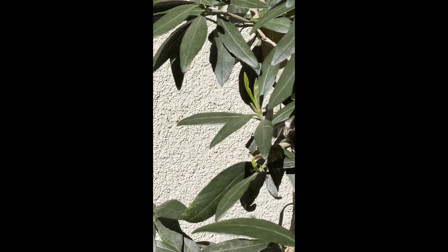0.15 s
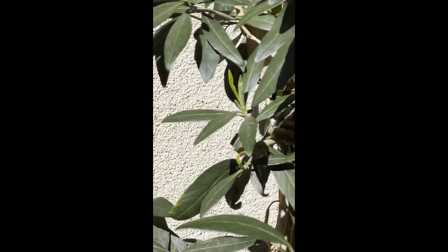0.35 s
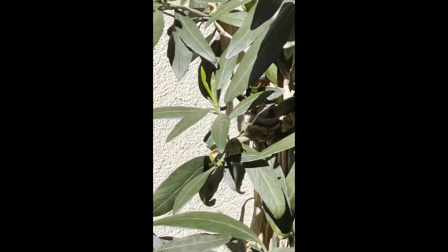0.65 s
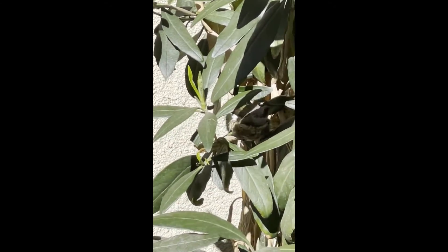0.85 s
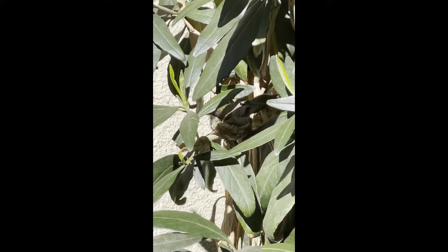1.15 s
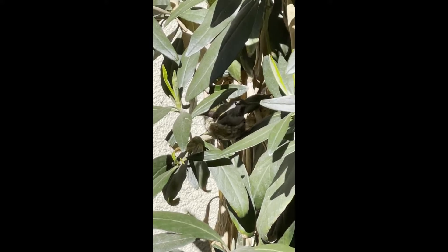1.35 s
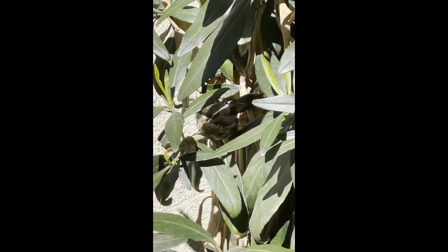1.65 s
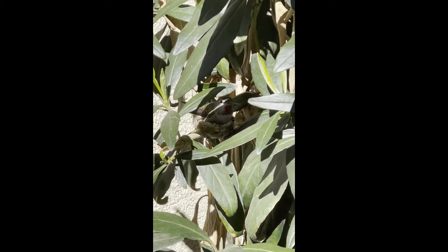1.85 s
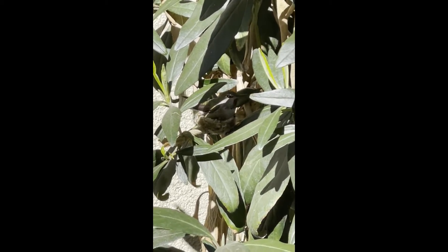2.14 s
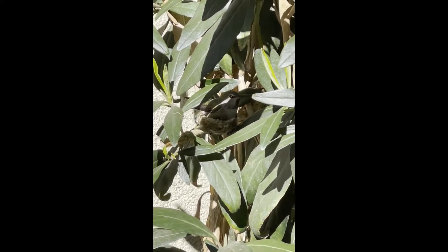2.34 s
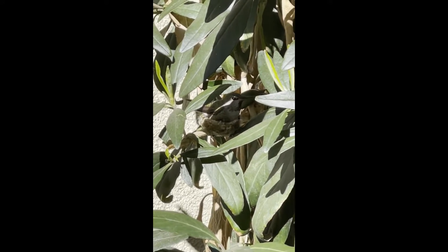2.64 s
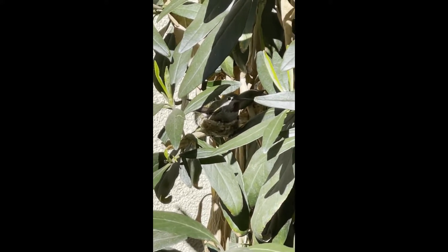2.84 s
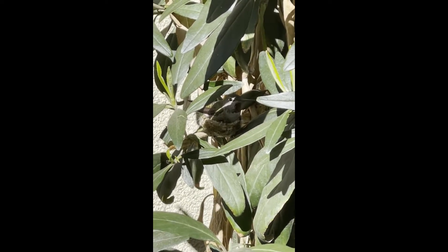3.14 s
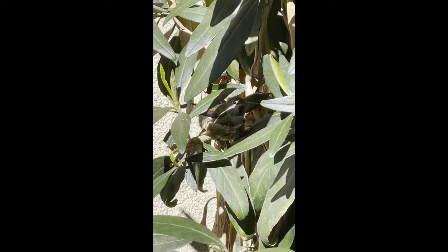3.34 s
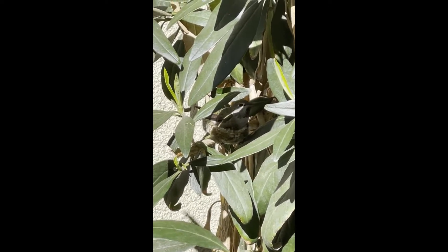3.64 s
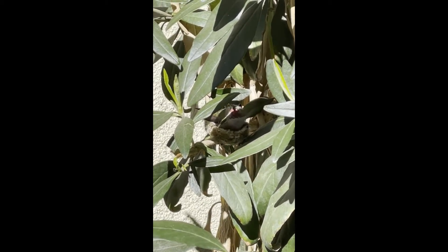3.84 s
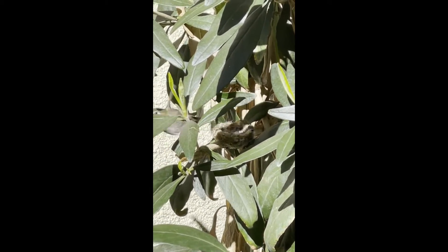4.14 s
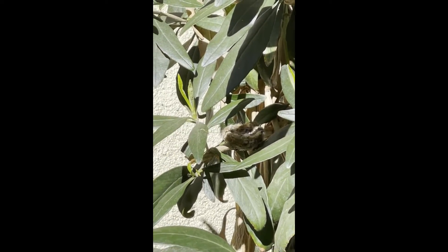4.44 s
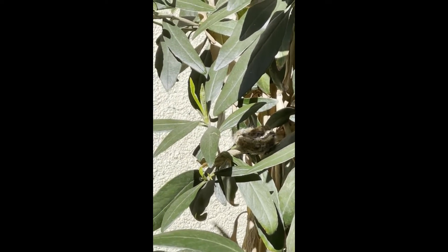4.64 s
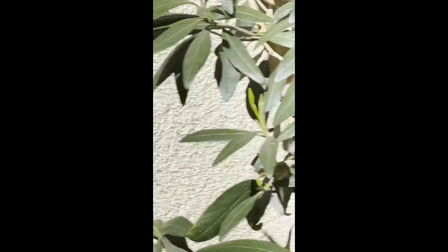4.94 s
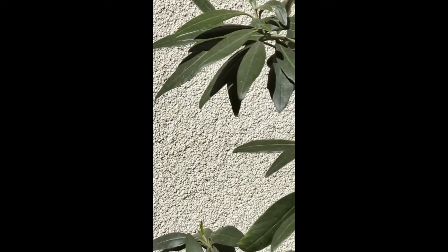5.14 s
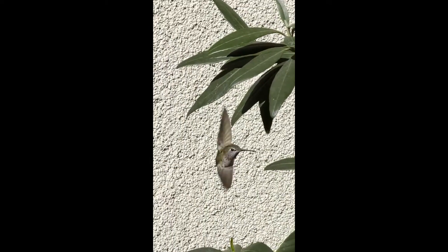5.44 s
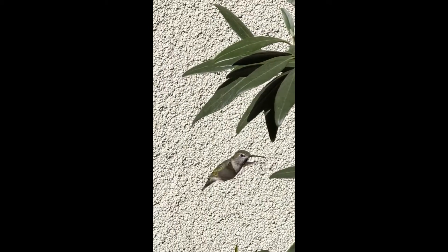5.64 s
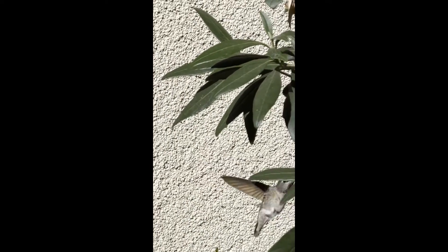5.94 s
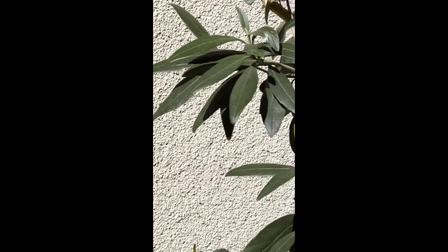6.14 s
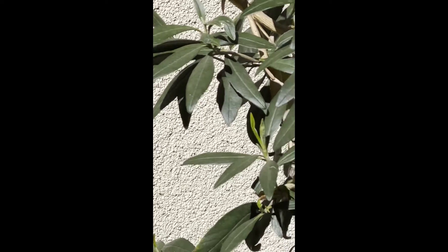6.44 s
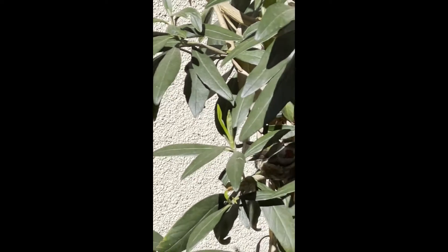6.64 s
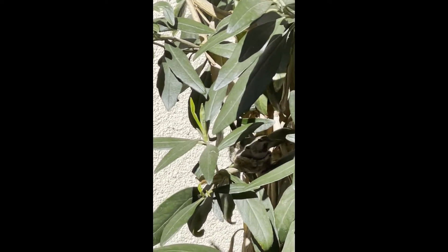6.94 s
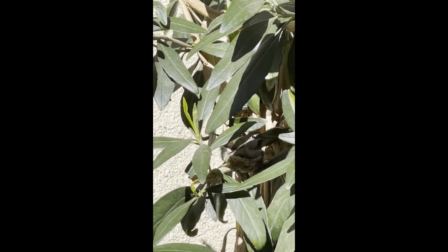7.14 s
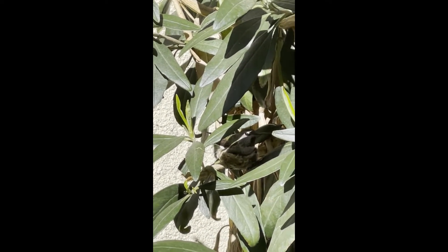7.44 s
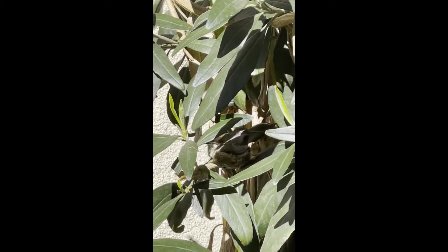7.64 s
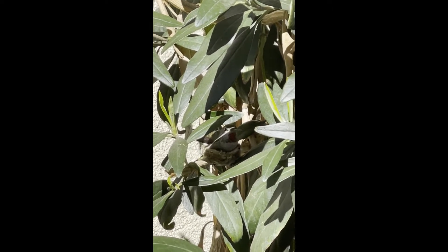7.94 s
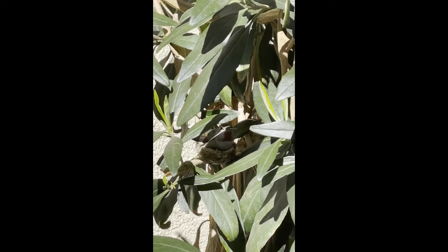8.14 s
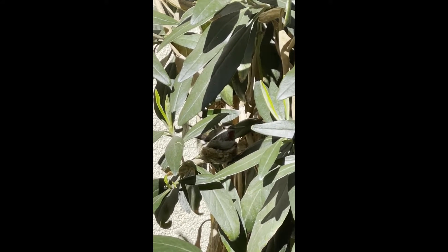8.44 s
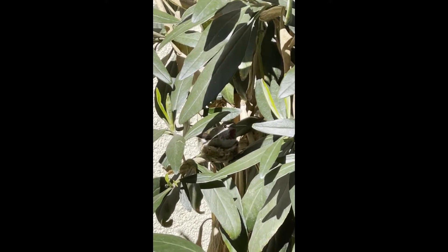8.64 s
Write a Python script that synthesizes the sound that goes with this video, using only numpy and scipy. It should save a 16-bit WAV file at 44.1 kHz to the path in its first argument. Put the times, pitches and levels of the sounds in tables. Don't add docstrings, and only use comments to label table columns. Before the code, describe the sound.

Close in a leafy shrub by a rough wall, a hummingbird gives single, very short falling chips, one every second or so. Leaves crackle at the start; midway its wings hum low and foliage rustles as it flies off and hovers. A crisp leaf snap follows, then a heavy dull wind thump on the small stereo microphone. Soft low rumble and faint drone continue throughout.

```python
import sys
import numpy as np
from scipy import signal
from scipy.fft import rfft, irfft, next_fast_len
from scipy.io import wavfile
from scipy.ndimage import map_coordinates

SR = 44100
rng = np.random.default_rng(int(sys.argv[2]) if len(sys.argv) > 2 else 0)


def unload_wav(signal):
    wavfile.write(
        sys.argv[1],
        SR,
        np.round(np.clip(np.atleast_2d(signal).T, -1, 1) * 32767).astype(np.int16),
    )


def magnitude_from_level(level_db):
    exponent = np.asarray(level_db, float) / 20
    return 10 ** exponent


N = 387198
BEAT_HZ = 46


def unit(x):
    return x / np.sqrt(np.mean(x ** 2) + 1e-20)


def along(points, hz):
    f, v = np.transpose(points)
    return np.interp(np.log(hz + 1), np.log(f + 1), v)


def wobble(rate):
    knots = rng.standard_normal(int(N * rate / SR) + 4)
    return map_coordinates(knots, [np.arange(N) * rate / SR])


def swell(middle, length):
    from_middle = (np.arange(N) / SR - middle) / length
    return np.cos(np.pi * np.clip(from_middle, -.5, .5)) ** 2


def progress(length):
    return np.arange(round(length * SR)) / (length * SR)


def turns(hz):
    return 2 * np.pi * np.cumsum(hz) / SR


def filtered(x, response):
    m = next_fast_len(x.shape[-1] + 8192)
    spectrum = rfft(x, m) * response(np.fft.rfftfreq(m, 1 / SR))
    return irfft(spectrum, m)[..., :x.shape[-1]]


def add(track, s, sound):
    part = track[..., round(s * SR):][..., :sound.shape[-1]]
    part += sound[..., :part.shape[-1]]


def rush(gain):
    # f/Hz, left-right likeness (0-1)
    alike = [(40, 0.98), (130, 1), (300, 0.96), (500, 0.67), (700, 0.58), (1200, 0.45), (1700, 0.98),
             (2300, 0.98), (4000, 0.83), (4750, 0.97), (12000, 0.97)]

    def shares(hz):
        angle = np.arccos(np.clip(along(alike, hz), -1, 1)) / 2
        return gain(hz) * [np.cos(angle), np.sin(angle)]

    mid, side = filtered(rng.standard_normal((2, N)), shares)
    return unit(np.array([mid + side, mid - side]))


def resonance(hz, width):
    return rush(lambda f: 1 / (1 + (2 * (f - hz) / width) ** 2))


def echoed(x):
    # f/Hz, t60/s
    yard = [(2000, 0.58), (6000, 0.35), (11000, .25), (13500, 0.05)]
    # delay/s, level/dB
    walls = [(.002, -7.5), (.0033, -7), (.0042, -11.5), (.008, -13.5), (.0125, -13.5), (.0155, -16.5),
             (0.017, -22.5), (0.03, -36), (.051, -22.5)]
    hz, t, z = signal.stft(rng.standard_normal(SR // 2), SR, nperseg=128)
    decay = magnitude_from_level(-60 * t / along(yard, hz)[:, None])
    tail = signal.istft(z * decay, SR, nperseg=128)[1]
    answer = magnitude_from_level(-13.0) * tail / np.linalg.norm(tail)
    for s, db in walls:
        smear_t60 = .0006 + .55 * s
        smear = magnitude_from_level(-60 * np.arange(1200) / SR / smear_t60)
        facets = smear * rng.standard_normal(len(smear))
        add(answer, s, magnitude_from_level(db) * facets / np.linalg.norm(facets))
    answer[0] += 1
    return signal.fftconvolve(x, answer)


def chips():
    # t/s, level/dB, start f/Hz, length/s, loudest f/Hz
    calls = [
        (0.387, -35, 8800, 0.0046, 6300),
        (1.771, -38, 7390, 0.0044, 6320),
        (2.8727, -37, 7620, 0.0048, 6760),
        (4.2347, -35.5, 9500, 0.0071, 6400),
        (5.2273, -36, 9500, 0.008, 7800),
        (5.8317, -30, 9400, 0.0064, 8600),
        (6.7267, -38.5, 7450, 0.0045, 5970),
        (7.7671, -36.5, 7560, 0.0043, 6300),
        (8.4205, -34, 8100, 0.0048, 7000),
    ]
    # f/Hz, level/dB
    mouth = [(1500, -34), (2500, -8), (3500, -5.5), (4500, -4.5), (5600, 0.5), (7000, -3.5), (8500, -1.5),
             (10800, 4.5), (12000, -4), (13500, -22), (15500, -33), (18000, -70)]
    out = np.zeros(N)
    for s, db, start_hz, length, loud_hz in calls:
        octave_db = -2.1 - 2.5 * (loud_hz - 6200) / 1000
        u = progress(length)
        hz = start_hz - (start_hz - 2700) * u ** 1.3
        edges = np.minimum(u / .15, 1) * np.minimum((1 - u) / .06, 1)
        whistle = magnitude_from_level(-np.minimum(4 * ((hz - loud_hz) / 2000) ** 2, 9))
        octave = magnitude_from_level(octave_db - 4.6 * ((2 * hz - 10600) / 2000) ** 2) + magnitude_from_level(-21.5)
        third = magnitude_from_level(-9.0) * u
        voice = whistle * np.sin(turns(hz))
        voice = voice + octave * np.sin(turns(2 * hz)) + third * np.sin(turns(3 * hz))
        add(out, s, magnitude_from_level(db) * echoed(edges * voice))
    return filtered(out, lambda hz: magnitude_from_level(along(mouth, hz)))


def flicks():
    # t/s, level/dB, t60/s, brightness/(dB per octave)
    blows = [(.0, -58, 0.16, -1), (.009, -54, 0.044, 11), (.013, -52.5, 0.031, 10), (.025, -53.5, 0.013, 7),
             (.039, -57, 0.045, 3), (0.054, -57, 0.017, 4), (.315, -70.5, 0.025, 7), (1.51, -75, .02, 5),
             (4.075, -60.5, 0.016, 3), (4.096, -56, 0.023, -2), (4.116, -51, 0.0034, 2),
             (4.12, -48.5, 0.002, 2), (4.774, -78, .01, -6), (5.152, -66, 0.5, -13.5),
             (5.406, -73, .15, -7), (6.129, -69, .015, 14), (6.184, -53, 0.034, 12.5),
             (6.185, -47, .006, 10), (6.188, -54, 0.012, 8), (6.203, -49, 0.0066, 7),
             (6.2045, -45.5, 0.015, 12), (6.217, -59.5, 0.017, 2), (6.52, -75, .02, 7),
             (7.06, -74, .05, -3), (6.322, -72, .01, 3)]
    # f/Hz, level/dB
    capsule = [(400, -68), (800, 4), (8000, 6.5), (9300, 7.5), (10800, 6.5), (12000, -6.5), (13500, -29),
               (15500, -41), (18000, -70)]
    brush = [(5.415 + k / BEAT_HZ, -59.5, 0.13, -6) for k in range(4)]
    out, t = np.zeros(N), np.arange(SR // 8) / SR
    for s, db, t60, slope_db in blows + brush:
        grains_db = 3.9 * rng.standard_normal(len(t) // 30 + 1).repeat(30)[:len(t)]
        crackle = rng.standard_normal(len(t)) * magnitude_from_level(grains_db - 60 * t / t60)
        burst = echoed(magnitude_from_level(db + 16.5) * crackle / np.linalg.norm(crackle))
        add(out, s, filtered(burst, lambda hz: magnitude_from_level(slope_db * np.log2((hz + 500) / 6000))))
    return filtered(out, lambda hz: magnitude_from_level(along(capsule, hz)))


def wings():
    # middle t/s, length/s, level/dB
    hovers = [
        (4.26, .5, -55.5),
        (5.206, 0.51, -56),
        (5.443, 0.19, -49.5),
        (5.68, 0.42, -62),
        (5.876, 0.31, -53),
        (6.0, 0.18, -57),
    ]
    near = sum(magnitude_from_level(db) * swell(s, length) for s, length, db in hovers)
    phase = turns(BEAT_HZ * (1 + .04 * wobble(14)))
    hum = sum(magnitude_from_level(-1.2 * k + 3.7 * wobble(15)) * np.sin(k * phase) for k in range(3, 10))
    return near * hum


def leaves():
    # middle t/s, length/s, rise/dB, brightness (0-1)
    stirs = [(.01, 0.46, 11, .1), (2.88, .3, 3, .05), (3.75, .12, 1, .2), (3.9, 0.72, 7.5, 0.37),
             (4.284, 0.38, 9.5, 0.44), (4.45, 0.97, 5, 0.82), (5.15, 0.99, 7.5, 0.98),
             (5.443, 0.31, 13, 0.93), (5.945, 0.92, 8, 0.82), (6.75, 1, 3, .9), (7.07, 0.22, 3.5, .1)]
    # f/Hz, level/dB
    swish = [(2000, -120), (2500, -4.5), (2900, -2.5), (3800, -7.5), (4800, -14.5), (5600, -19),
             (6500, -120)]
    rustle = [(3000, -120), (4500, -6), (6000, -2.5), (8000, -3), (9500, -4.5), (11000, -14), (12000, -120)]
    sizzle = [(8000, -120), (9000, -12), (10000, -2.5), (11000, 0.5), (12000, -12.5), (13000, -13),
              (14000, -38.5), (15000, -120)]
    dull_db, bright_db = np.zeros(N), np.zeros(N)
    for s, length, db, bright in stirs:
        rise_db = db * swell(s, length)
        dull_db += np.clip(2 - 2 * bright, 0, 1) * rise_db
        bright_db += np.clip(2 * bright, 0, 1) * rise_db
    layers = [(-79.5 + 0.37 * dull_db, swish), (-87 + dull_db, rustle), (-91.5 + bright_db, sizzle)]
    flicker = magnitude_from_level(1.2 * wobble(16))
    return flicker * sum(magnitude_from_level(db) * rush(lambda hz: magnitude_from_level(along(shape, hz))) for db, shape in layers)


def bumps():
    # t/s, level/dB, start f/Hz, end f/Hz, length/s
    eddies = [(6.8195, -16.5, 400, 31, .039), (6.853, -16, 400, 39, .042), (6.896, -27, 220, 40, .032),
              (6.918, -24, 100, 50, .035), (6.662, -30, 85, 55, .04), (6.698, -29, 105, 55, .05),
              (6.74, -35, 90, 50, .04), (5.095, -33, 110, 55, .045), (5.16, -28, 90, 40, .07),
              (5.84, -30, 105, 45, .06), (6.18, -31, 130, 50, .04), (6.29, -36, 80, 45, .06),
              (4.77, -34, 80, 50, .06), (2.74, -38, 110, 50, .05), (7.495, -37, 120, 50, .05),
              (7.61, -39, 230, 140, .03), (7.668, -38, 220, 60, .05), (7.96, -41, 170, 55, .035),
              (8.125, -40, 200, 80, .035), (8.378, -35, 220, 110, .03), (8.655, -39, 100, 50, .04),
              (8.72, -36, 130, 50, .04)]
    out = np.zeros((2, N))
    for s, db, start_hz, end_hz, length in eddies:
        u = progress(length)
        hz = 1 / (1 / start_hz + (1 / end_hz - 1 / start_hz) * u)
        push = np.sin(np.pi * u ** .53) ** 1.6
        skew = rng.uniform(.11, .17) * np.array([[1], [-1]])
        add(out, s, magnitude_from_level(db - 2.5) * push * np.sin(turns(hz) + 2.7 + skew))
    return filtered(out, lambda hz: 1 / (1 + (hz / 340) ** 6))


def peeps():
    # [(middle t/s, length/s, level/dB)]
    voices = [
        (4580, 550, [(3.75, 0.49, -80), (4.0, .5, -80), (4.4, 0.76, -81)]),
        (5620, 260, [(3.975, .06, -73), (4.04, 0.16, -80), (4.49, .09, -80), (4.55, .14, -85)]),
        (3250, 110, [(4.02, 0.18, -76), (4.39, .06, -82), (4.49, .15, -81)]),
        (11100, 300, [(2.44, .18, -91)]),
    ]
    out = np.zeros((2, N))
    for hz, width, notes in voices:
        sung = sum(magnitude_from_level(db) * swell(s, length) for s, length, db in notes)
        out += sung * magnitude_from_level(4.6 * wobble(40)) * resonance(hz, width)
    return out


def air():
    # t/s, buffet level/dB
    wind = [(0, -49.5), (.24, -55), (.49, -57), (.68, -50.5), (.9, -56.5), (1.6, -52.5), (2.7, -53),
            (3.3, -58), (3.54, -48), (3.84, -54.5), (4.2, -48.5), (4.5, -51), (4.8, -48.5), (5.75, -50.5),
            (6.8, -49.5), (7.2, -52), (8.1, -50), (8.78, -49)]
    # middle t/s, length/s, level/dB
    ducks = [
        (7.382, 0.51, -9),
        (7.853, 0.51, -11),
        (8.504, 0.88, -4),
    ]
    # f/Hz, level/dB
    buffet_shape = [(12, -56), (20, -23.5), (36, -5), (70, 3), (92, -3), (160, -11.5), (210, -44.5),
                    (350, -120)]
    rumble_shape = [(53, -37.5), (90, -4), (242, -9), (281, -9.5), (319, -18), (378, -16.5), (450, -36),
                    (580, -50), (990, -120)]
    town_shape = [(250, -120), (330, -3.5), (500, -3.5), (750, -8), (950, -10), (1300, -14.5),
                  (1800, -16.5), (2400, -19.5), (3000, -32.5), (3600, -120)]
    # f/Hz, width/Hz, level/dB
    machine = [(1487, 40, -81), (1563, 32, -81.5), (528, 33, -75.5), (367, 33, -77), (1955, 76, -80.5),
               (2076, 54, -81), (2420, 35, -89), (295.2, 13.4, -69), (653.5, 30, -74)]
    duck_db = sum(db * swell(s, length) for s, length, db in ducks)
    buffet_db = np.interp(np.arange(N) / SR, *np.transpose(wind)) + duck_db
    rumble_db = -55.5 + 1.05 * duck_db + 1.08 * wobble(4)
    buffet = magnitude_from_level(buffet_db + 1.2 * wobble(14)) * rush(lambda hz: magnitude_from_level(along(buffet_shape, hz)))
    rumble = magnitude_from_level(rumble_db + 0.9 * wobble(18)) * rush(lambda hz: magnitude_from_level(along(rumble_shape, hz)))
    town = magnitude_from_level(-63 + 1.05 * wobble(3.064)) * rush(lambda hz: magnitude_from_level(along(town_shape, hz)))
    drone = sum(magnitude_from_level(db + 1.2 * wobble(2.93)) * resonance(hz, width) for hz, width, db in machine)
    return buffet + rumble + town + drone


def scene():
    return chips() + flicks() + wings() + leaves() + bumps() + peeps() + air()


def top_cut(x):
    return signal.sosfilt(signal.butter(12, 15900, fs=SR, output="sos"), x)


def record(dry):
    # f/Hz, left lead/rad
    lead = [(40, 0), (1400, -.32), (2400, .5), (4000, .75), (4500, 1.45), (4850, 2.95), (5170, 4.9),
            (5500, 5.87), (6050, 6.44), (7250, 7.75), (8800, 9.25), (9350, 9.5), (11400, 11.5),
            (12500, 12.57)]
    # f/Hz, left minus right/dB
    tilt = [(300, 0), (650, -1.5), (1200, -1), (2000, 0.5)]
    half = np.array([[.5], [-.5]])
    pair = filtered(dry, lambda hz: magnitude_from_level(half * along(tilt, hz)) * np.exp(1j * half * along(lead, hz)))
    return top_cut(pair)


dry = scene()
out = record(dry)
unload_wav(out)
```